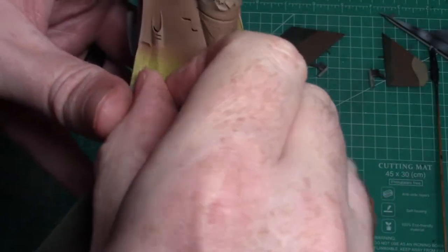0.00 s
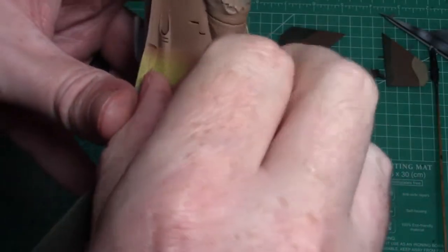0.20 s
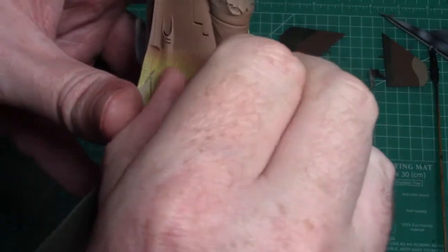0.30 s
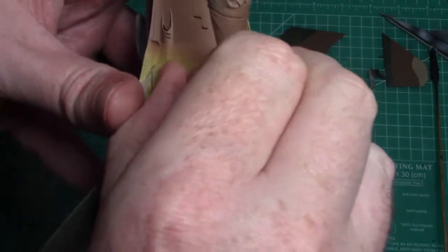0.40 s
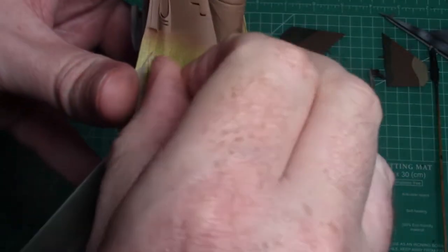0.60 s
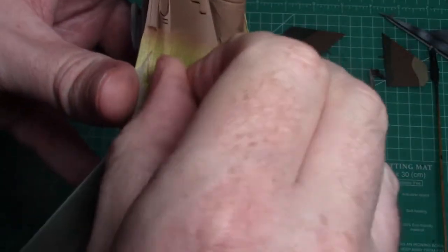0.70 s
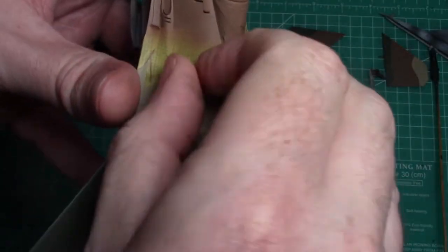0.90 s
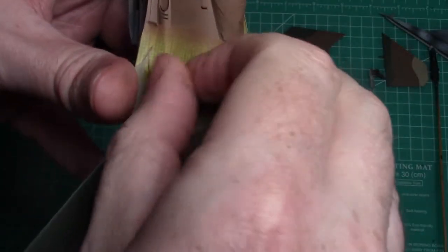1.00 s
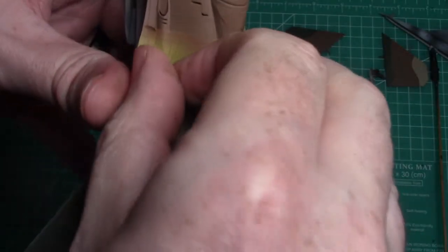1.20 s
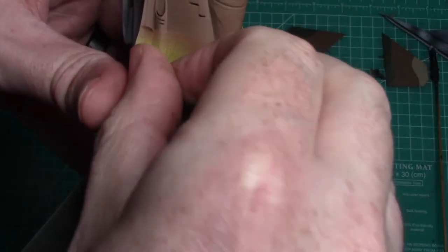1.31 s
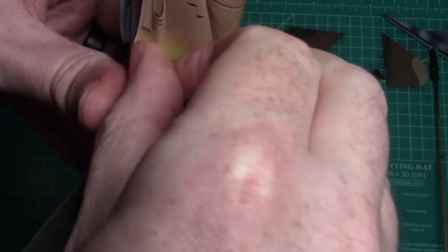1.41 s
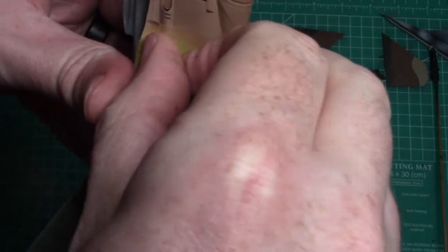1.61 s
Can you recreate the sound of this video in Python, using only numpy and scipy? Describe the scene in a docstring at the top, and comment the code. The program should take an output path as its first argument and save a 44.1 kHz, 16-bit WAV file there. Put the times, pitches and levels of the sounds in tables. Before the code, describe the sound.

Close to the microphone, tape rasps and crackles off a light plastic shell and lets go with a hard crack. Fingers then quietly rub and pick, ending with small dull bumps, over faint room hush.

```python
"""A short rasping pull brightens as masking tape lifts off a hollow plastic model, close to the microphone.
The tape lets go and the shell snaps loudly; fingers then rub and pick at the next edge with faint ticks
and bump the model as they change grip. Slips of parting glue drive the rasp and fizz, damped modes ring
the shell, and shaped noise and grains make ticks, rubs and scuff, all in a small, quiet workroom."""
import sys
import numpy as np
from scipy import signal
from scipy.io import wavfile

SR = 44100
rng = np.random.default_rng(int(sys.argv[2]) if len(sys.argv) > 2 else 0)


def unload_audio(sound):
    """Save the sound as a 16-bit wav file, at the path given as the first command line argument."""
    columns = np.transpose(np.atleast_2d(sound))
    # keep every value between -1 and 1, then stretch to whole-number steps
    steps = np.round(np.clip(columns, -1, 1) * 32767)
    wavfile.write(sys.argv[1], SR, steps.astype(np.int16))


N = 72765
TIME = np.arange(N) / SR
HZ = np.fft.rfftfreq(4096, 1 / SR)
SHORT = len(HZ)  # samples, about 46 ms


def amp(db):
    """Decibels to gain."""
    return 10 ** (np.asarray(db) / 20)


def unit(x):
    """Scales to rms 1."""
    return x / np.sqrt(np.mean(x ** 2) + 1e-20)


def read(points, hz=HZ):
    """Interpolates a table on a log-frequency axis."""
    points_hz, value = np.transpose(points)
    return np.interp(np.log(hz + 1), np.log(points_hz + 1), value)


def add(mix, start_s, sound):
    """Adds a sound into the mix at its start time."""
    part = mix[max(round(start_s * SR), 0):][:len(sound)]
    part += sound[:len(part)]


def colour(x, gain_db):
    """Minimum-phase filter with the given gain at each frequency of HZ."""
    log_gain = np.log(amp(np.maximum(gain_db, -100)))
    both_sides = np.r_[log_gain, log_gain[-2:0:-1]]
    spectrum = np.exp(np.conj(signal.hilbert(both_sides)))
    taps = np.fft.ifft(spectrum).real
    return signal.fftconvolve(x, taps)[:len(x)]


def noise(gain_db, size):
    """Coloured noise of rms 1, filter onset dropped."""
    white = rng.standard_normal(size + SHORT)
    return unit(colour(white, gain_db)[SHORT:])


def burst(table, shape):
    """Noise burst coloured after shaping, with the rms of its shape."""
    shaped = shape * rng.standard_normal(len(shape))
    return unit(colour(shaped, read(table))) * np.sqrt(np.mean(shape ** 2))


def hump(centre_hz, width_octaves):
    """Broad band with straight skirts, in dB."""
    offset = np.log2((HZ + 1) / centre_hz) / width_octaves
    return -10 * np.log10(1 + offset ** 4 * 2)


def peaks(table):
    """Resonances that stand out of a flat response, in dB."""
    power = sum(amp(db) ** 2 / (1 + (2 * (HZ - hz) / width_hz) ** 2) for hz, width_hz, db in table)
    return 10 * np.log10(1 + power)


def slips(rate_per_s, spread_db):
    """Random tiny clicks of uneven size and either sign."""
    size = amp(spread_db * np.minimum(rng.exponential(1, N), 4))
    sign = rng.choice([-1, 1], N)
    return size * sign * (rng.random(N) < rate_per_s / SR)


def swell(start_s, rise_s, fall_s):
    """Stroke envelope: linear build-up, then a 20 dB drop per fall time."""
    t = TIME - start_s
    return np.clip(t / rise_s, 0, 1) * amp(-20 * np.maximum(t - rise_s, 0) / fall_s)


# room noise spectrum: freq_hz, relative_density_db
AIR_COLOUR = [(15, -40), (25, -23), (110, -8), (281, -3.5), (359, -1.5), (762, -6.5), (848, -7.5),
              (1900, -13), (2060, -13), (2630, -12.5), (2850, -18), (4040, -18), (12200, -29), (15500, -47)]
# left-right likeness: freq_hz, likeness_0_to_1
AIR_LIKENESS = [(25, .55), (80, 0.71), (300, 0.83), (1000, 0.73), (12000, 0.84)]
AIR_RMS_DB = -62.5


def air():
    """Steady room noise; shared and opposed parts set the left-right likeness."""
    same = np.clip(read(AIR_LIKENESS), 0, .999)

    def part(sign):
        white = rng.standard_normal(N + SHORT)
        return colour(white, read(AIR_COLOUR) + 10 * np.log10(1 + sign * same))[SHORT:]

    mid, side = part(1), part(-1)
    return amp(AIR_RMS_DB) * unit(np.array([mid + side, mid - side]))


# echo decay: freq_hz, t60_s
ROOM_DECAY = [(600, 0.57), (1200, 0.61), (2000, 0.43), (4500, 0.52), (8000, 0.48), (14000, 0.8)]
# echo strength: freq_hz, level_db
ROOM_STRENGTH = [(100, -15), (600, -8), (1500, -13.5), (3000, -14), (6000, -11.5), (14000, -14.5)]
ROOM_DELAY_S, ROOM_SIDE_GAIN = .005, 0.18


def room(x):
    """Diffuse stereo echo whose bands die at their own speeds."""
    hz, t, grid = signal.stft(rng.standard_normal((2, SR // 2)), SR, nperseg=256)
    fade = amp(-60 * t / read(ROOM_DECAY, hz)[:, None])
    energy = (fade ** 2).sum(1, keepdims=True) * t[1] * SR
    fade *= amp(read(ROOM_STRENGTH, hz))[:, None] / np.sqrt(energy)
    tails = signal.istft(grid * fade, SR)[1]
    tails = np.pad(tails, ((0, 0), (round(ROOM_DELAY_S * SR), 0)))
    mid, side = signal.fftconvolve(x[None], tails, axes=1)[:, :N]
    return np.array([mid + ROOM_SIDE_GAIN * side, mid - ROOM_SIDE_GAIN * side])


BENCH_DB, BENCH_T60_S = -11, 0.089


def bench(x):
    """Dense early reflections from the bench and the hands, as decaying noise taps."""
    t = TIME[:SHORT * 2]
    taps = rng.standard_normal(len(t)) * amp(-60 * t / BENCH_T60_S) * (t > ROOM_DELAY_S)
    return amp(BENCH_DB) * signal.fftconvolve(x, taps / np.linalg.norm(taps))[:N]


# finger rubs on tape: start_s, rise_s, fall_s, level_db, centre_hz, width_octaves
RUB_STROKES = [(0.676, 0.016, 0.09, -64.5, 3060, 0.37), (0.734, 0.013, 0.11, -68, 7000, 0.49),
               (0.859, 0.12, 0.16, -57.5, 1800, 1), (1.01, 0.048, 0.027, -59, 2480, 0.72),
               (1.14, 0.0075, 0.018, -60, 1600, 1), (1.203, .005, 0.13, -55, 5500, 0.47),
               (1.31, 0.018, 0.063, -66.5, 1800, 0.66), (1.406, 0.013, 0.011, -58.5, 2250, 0.16),
               (1.438, 0.045, 0.025, -61, 1510, 0.94)]
# shell resonances under the fingers: freq_hz, width_hz, level_db
HELD_SHELL = [(1200, 270, 5.5), (1890, 78, 9), (3190, 270, 6)]
GRAINS_PER_S, GRAIN_SPREAD_DB = 6000, 2.5


def rubs():
    """Fingertips slide on the crepe paper: fine grains that swell and fade."""
    out = np.zeros(N)
    for start_s, rise_s, fall_s, level_db, centre_hz, width_octaves in RUB_STROKES:
        grains = slips(GRAINS_PER_S, GRAIN_SPREAD_DB)
        rub = unit(colour(grains, hump(centre_hz, width_octaves) + peaks(HELD_SHELL)))
        out += amp(level_db) * swell(start_s, rise_s, fall_s) * rub
    return out


# dragging fingertip spectrum: freq_hz, gain_db
SCUFF_COLOUR = [(100, -19), (500, 2.5), (900, -7), (1300, 0), (1650, 3), (1950, -3), (2300, -20.5),
                (3500, -12.5), (6400, -34), (8000, -26), (14000, -36)]
# low rumble spectrum, also the thud of the knocks: freq_hz, gain_db
THUD_COLOUR = [(25, -2.5), (70, -6), (160, 8.5), (300, -4), (480, -1.5), (900, -15.5), (3000, -35),
               (16000, -81.5)]
SCUFF_START_S, SCUFF_RISE_S, SCUFF_FALL_S = 1.507, .016, 0.024
SCRAPE_DB, RUMBLE_DB = -46, -57


def scuff():
    """A fingertip sticks and slips on the shell as the grip changes."""
    grains = slips(GRAINS_PER_S, GRAIN_SPREAD_DB)
    scrape = unit(colour(grains, read(SCUFF_COLOUR)))
    rumble = unit(colour(grains, read(THUD_COLOUR)))
    stroke = swell(SCUFF_START_S, SCUFF_RISE_S, SCUFF_FALL_S)
    return stroke * (amp(SCRAPE_DB) * scrape + amp(RUMBLE_DB) * rumble)


# dry ticks of creasing tape: start_s, level_db, centre_hz, width_octaves
CREASES = [(.1172, -35, 2420, 0.39), (0.13, -38, 2540, 1.2), (0.135, -41, 3500, 1.1),
           (.1570, -35.5, 6200, 0.35), (.1642, -47.5, 6500, 1.2), (0.3172, -42, 3180, 0.31),
           (0.4453, -48.5, 4850, 1.15), (0.4588, -49, 4760, .6), (0.566, -48.5, 2530, 1.1),
           (0.5701, -54.5, 3000, 1), (0.8408, -48, 3160, 0.41), (0.9868, -42.5, 1360, .8),
           (0.9874, -55, 13100, 0.24), (1.0604, -49, 3850, 0.65), (1.1806, -59, 3740, 0.34),
           (1.1852, -43, 4150, 0.77), (1.443, -53, 3040, 0.8), (1.4802, -47.5, 3870, 0.74)]
TICK_RISE_S, TICK_DECAY_S = 0.00052, .0016  # decay to 1/e


def ticks():
    """Creases in the tape give way in tiny noise bursts."""
    out, t = np.zeros(N), TIME[:SHORT]
    shape = np.minimum(t / TICK_RISE_S, 1) * np.exp(-t / TICK_DECAY_S)
    for start_s, level_db, centre_hz, width_octaves in CREASES:
        tick = shape * noise(hump(centre_hz, width_octaves), len(t))
        add(out, start_s, amp(level_db) * tick)
    return out


# shell modes: freq_hz, relative_level_db, t60_s
SHELL_MODES = [(324, -38, 0.04), (549, -35, 0.06), (721, -20.5, 0.05), (894, -17.5, 0.05),
               (1241, -7.5, 0.023), (1552, -6.5, 0.017), (1921, 1, 0.0152), (2315, -25.5, 0.0093),
               (2843, -14.5, 0.022), (3083, -16, 0.01), (3220, -15, 0.024), (4110, -12, 0.02),
               (4714, -18.5, 0.017), (5210, -26, 0.012), (6220, -25.5, 0.012)]
SHELL_HOLD_S = 0.0031


def shell(t):
    """Modes of the hollow plastic, held while the tape drives them, then damped by the hand."""
    free_s = np.maximum(t - SHELL_HOLD_S, 0)
    ring = np.zeros(len(t))
    for k, (freq_hz, level_db, t60_s) in enumerate(SHELL_MODES):
        ring += (-1) ** k * amp(level_db - 60 * free_s / t60_s) * np.sin(2 * np.pi * freq_hz * t)
    return ring


# knocks on the shell: start_s, ring_and_throw_db, crack_db, thud_db
SHELL_KNOCKS = [(0.032, -38, -45, -48), (0.0376, -47, -68, -54), (.2208, -59, -65, -75),
                (0.2454, -14, -23.5, -40), (1.4900, -56.5, -59, -71), (1.5104, -51, -54, -57),
                (1.5208, -48.5, -47.5, -54.5), (1.5290, -54, -50.5, -64)]
# sharp crack spectrum: freq_hz, gain_db
CRACK_COLOUR = [(100, -34), (550, -11), (900, -4.5), (1500, 5.5), (2700, 1), (3600, 2), (4900, -3.5),
                (6000, -1.5), (7100, -7.5), (9000, -10.5), (12000, -18), (16000, -16)]
# sound thrown into the room besides the ring: freq_hz, gain_db
THROWN_COLOUR = [(100, 4), (330, 10.5), (420, 7), (520, 13.5), (860, 22), (1100, 24.5), (1600, 17),
                 (1950, 25), (2200, 0), (2400, 23), (2900, 29.5), (3500, 12.5), (4100, 14), (4900, 18),
                 (5600, 11.5), (7000, 10), (10000, -2), (14000, -15)]
KNOCK_RISE_S, CRACK_DECAY_S, THUD_DECAY_S = 0.00092, 0.0038, 0.0036  # decays to 1/e


def knocks():
    """Knocks ring the shell with crack and thud; returns near sound and sound thrown into the room."""
    near, kicks, t = np.zeros(N), np.zeros(N), TIME[:SHORT * 2]
    rise = 1 - np.exp(-(t / KNOCK_RISE_S) ** 2)
    ring = rise * shell(t)
    for start_s, ring_db, crack_db, thud_db in SHELL_KNOCKS:
        crack = burst(CRACK_COLOUR, rise * np.exp(-t / CRACK_DECAY_S))
        thud = burst(THUD_COLOUR, rise * np.exp(-t / THUD_DECAY_S))
        add(near, start_s, amp(ring_db) * ring + amp(crack_db) * crack + amp(thud_db) * thud)
        add(kicks, start_s, amp([ring_db]))
    return near, colour(kicks, read(THROWN_COLOUR))


# course of the pull: time_s, rasp_before_trim_db, fizz_db
PULL_COURSE = [(0.0, -55, -67), (0.026, -49.5, -70), (0.034, -55.5, -65), (0.056, -53, -66.5),
               (0.088, -50, -60), (0.116, -41, -54.5), (0.136, -36.5, -48), (0.162, -58.5, -49.5),
               (0.186, -74, -70), (0.235, -75, -80)]
# rasp spectrum: freq_hz, gain_db
RASP_COLOUR = [(60, -29), (180, -21), (370, -4), (560, -16.5), (800, -3), (1300, 1.5), (2400, -0.5),
               (3300, 0), (5000, -7), (16000, -46)]
# parting-glue fizz spectrum: freq_hz, gain_db
FIZZ_COLOUR = [(300, -36.5), (2000, 2), (3800, 6.5), (5100, 2), (6400, 5), (8500, -5), (12500, -7),
               (16000, -25)]
# taut strip resonances: freq_hz, width_hz, level_db
STRIP_MODES = [(1294, 40, 11.5), (2047, 37, 15.5), (2476, 28, 8), (2544, 52, 15)]
RASP_TRIM_DB, SLIPS_PER_S, SLIP_SPREAD_DB = -2, 5700, 3


def peel():
    """Glue parts in many slips that ring the taut strip and fizz as it lifts."""
    time_s, rasp_db, fizz_db = np.transpose(PULL_COURSE)
    drive = slips(SLIPS_PER_S, SLIP_SPREAD_DB)
    rasp = unit(colour(drive, read(RASP_COLOUR) + peaks(STRIP_MODES)))
    rasp *= amp(RASP_TRIM_DB + np.interp(TIME, time_s, rasp_db))
    fizz = unit(colour(drive, read(FIZZ_COLOUR)))
    fizz *= amp(np.interp(TIME, time_s, fizz_db))
    stop = np.clip((time_s[-1] - TIME) / .01, 0, 1)  # 10 ms fade
    return stop * (rasp + fizz)


RING_TO_ROOM_DB = -3
LEAN_DB = 0.44  # left up, right down by this much


def scene():
    """The hands work just left of centre, in a quiet room."""
    near, thrown = knocks()
    tape = scuff() + ticks() + peel() + rubs()
    far = tape + thrown + amp(RING_TO_ROOM_DB) * near
    hands = near + tape + bench(far) + room(far)
    return hands * amp([[LEAN_DB], [-LEAN_DB]]) + air()


# microphone response: freq_hz, gain_db
MIC_RESPONSE = [(25, -5), (130, 0), (11000, 0), (13000, -3), (15800, -6.5)]
EDGE_HZ = 15800


def record(dry):
    """The microphone's colour, then the recorder's band limit."""
    heard = np.array([colour(channel, read(MIC_RESPONSE)) for channel in dry])
    low_pass = signal.firwin(511, EDGE_HZ, window=("kaiser", 9), fs=SR)
    return signal.oaconvolve(heard, low_pass[None], "same")


dry = scene()
out = record(dry)
unload_audio(out)
```